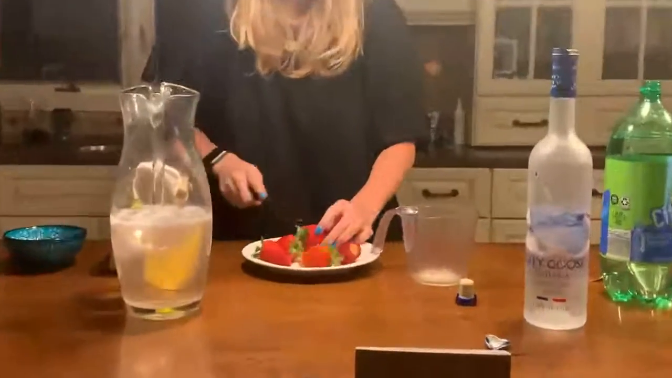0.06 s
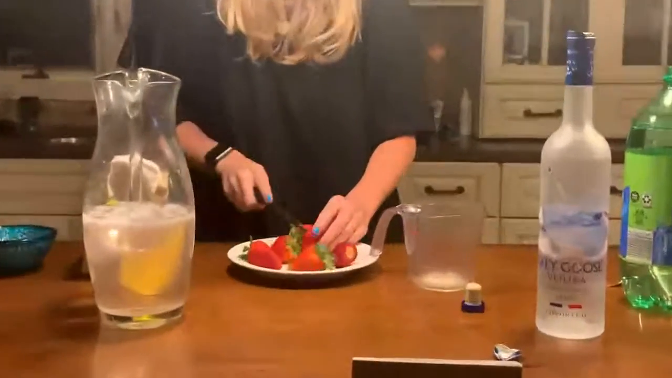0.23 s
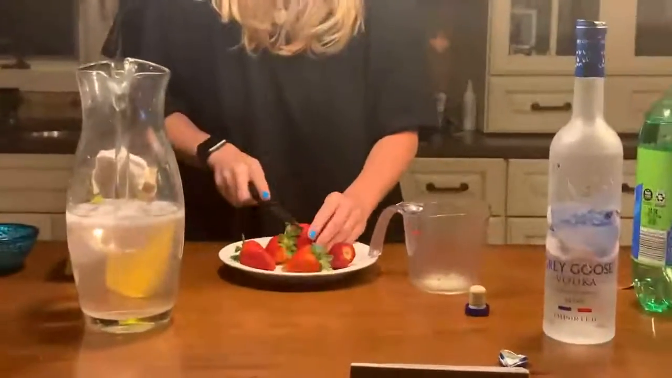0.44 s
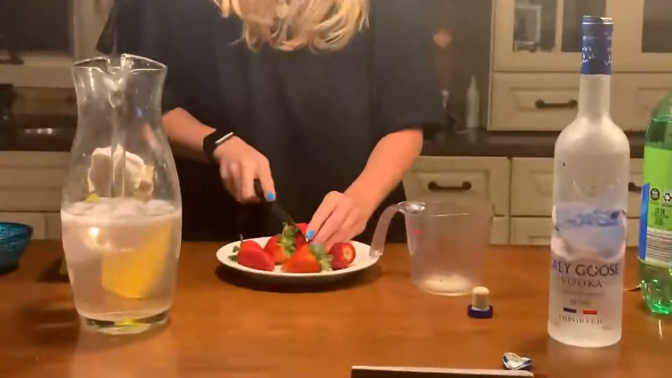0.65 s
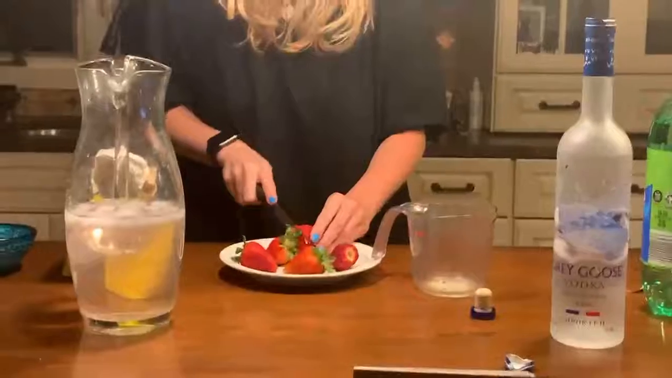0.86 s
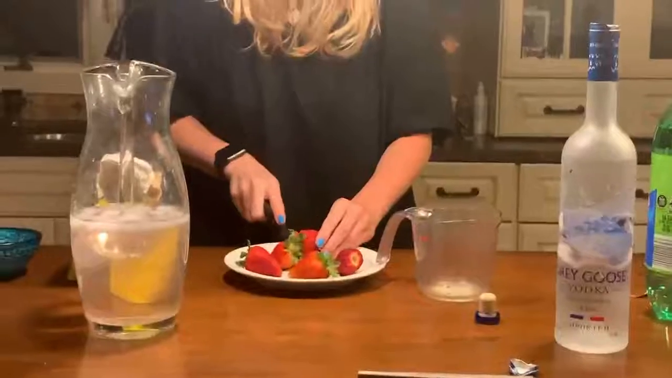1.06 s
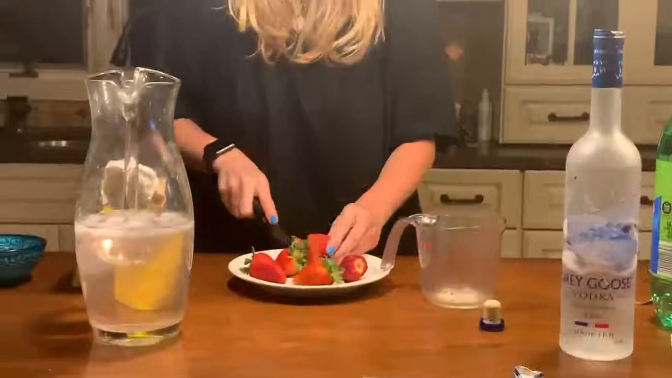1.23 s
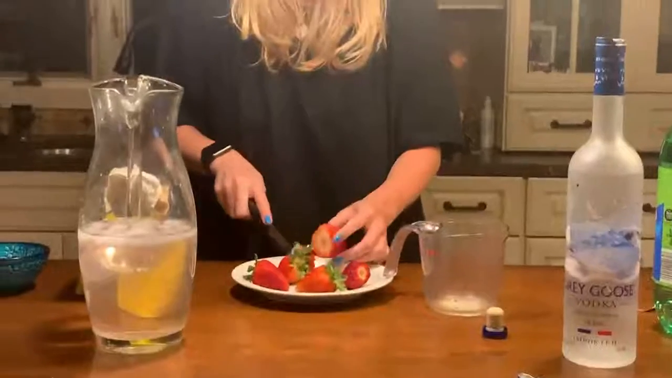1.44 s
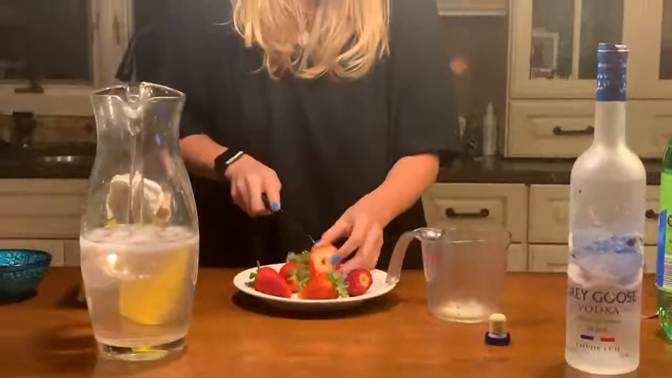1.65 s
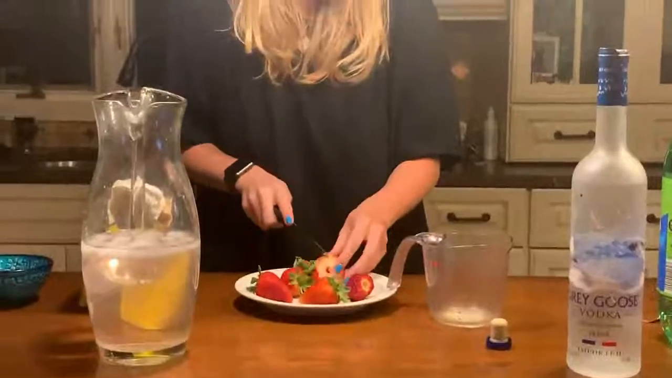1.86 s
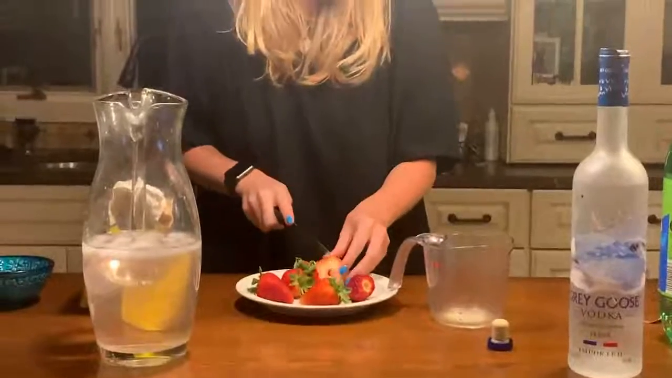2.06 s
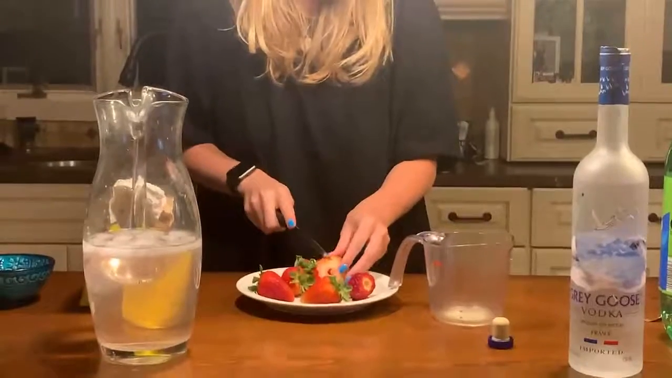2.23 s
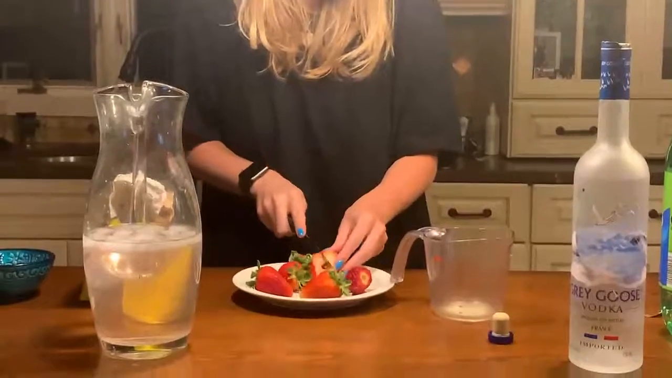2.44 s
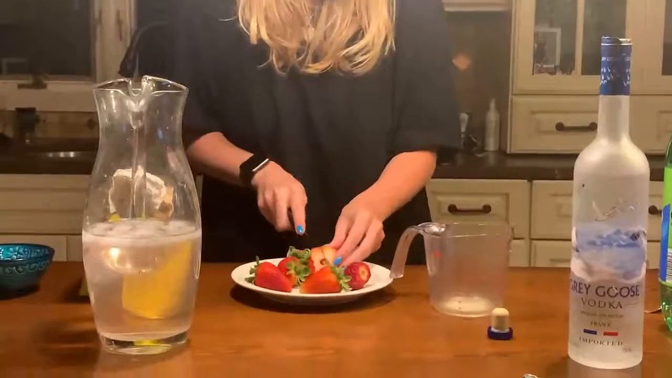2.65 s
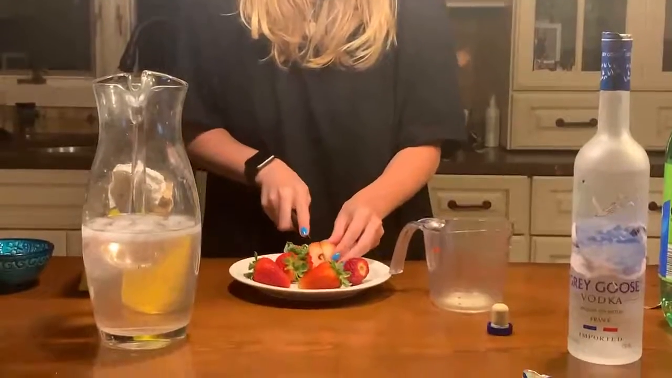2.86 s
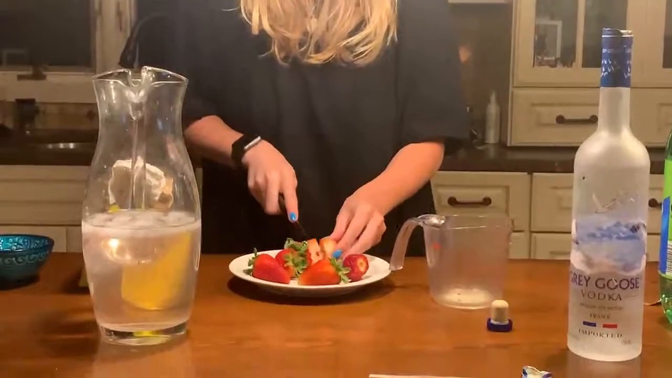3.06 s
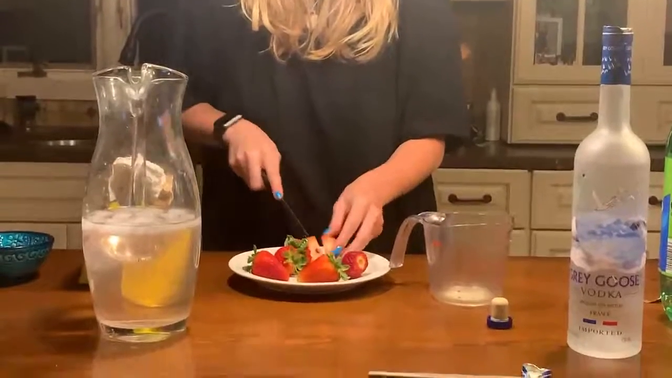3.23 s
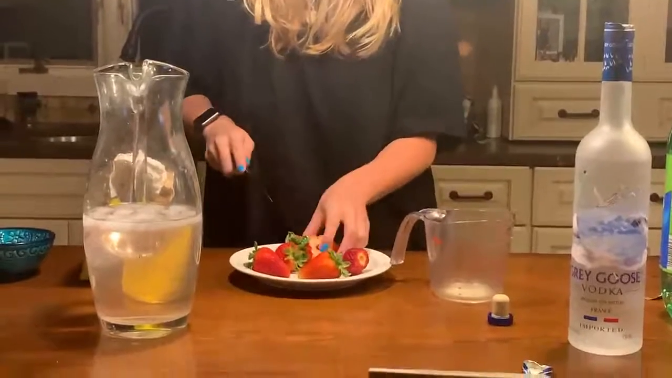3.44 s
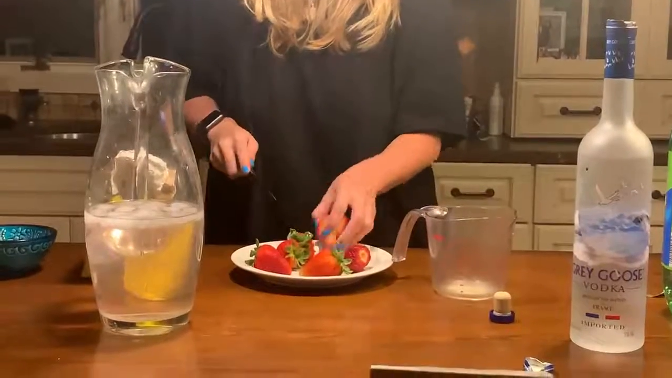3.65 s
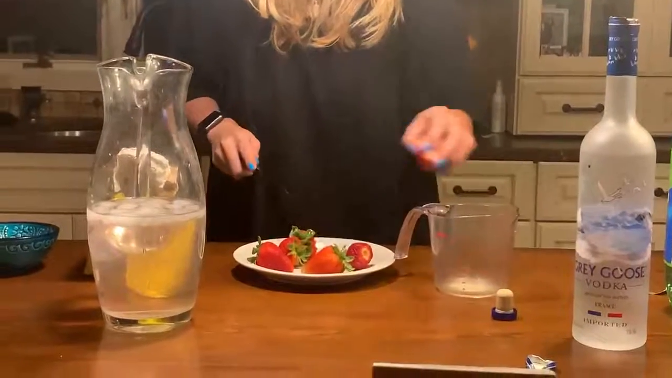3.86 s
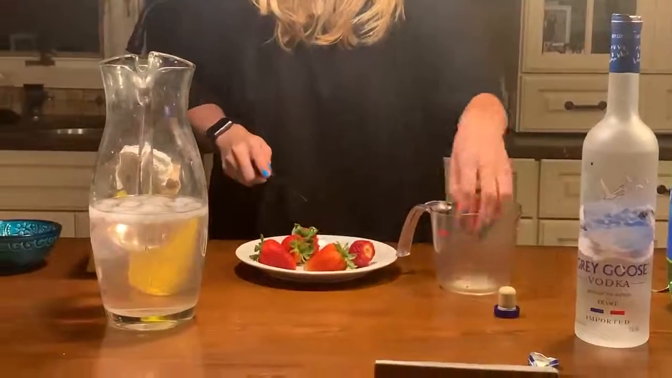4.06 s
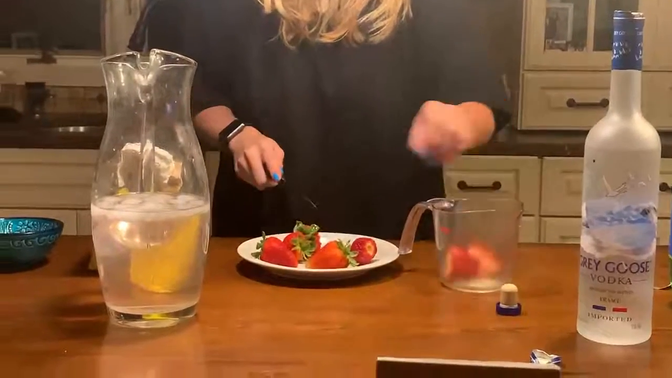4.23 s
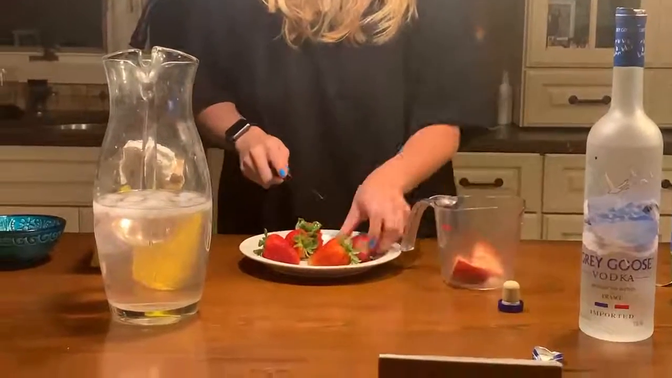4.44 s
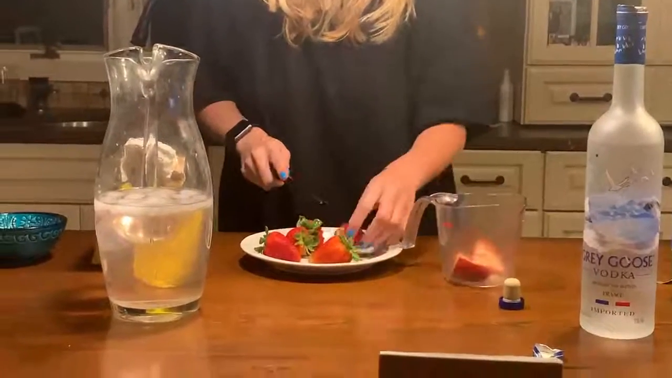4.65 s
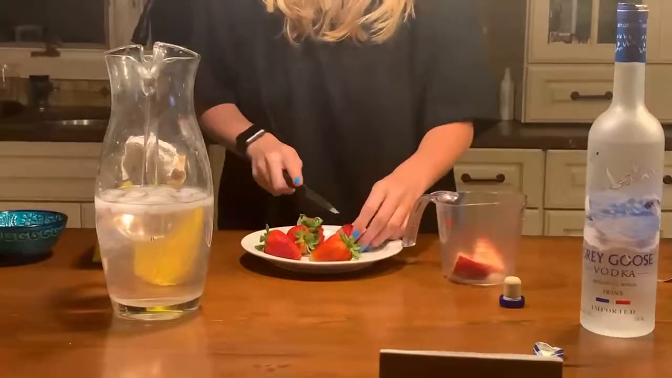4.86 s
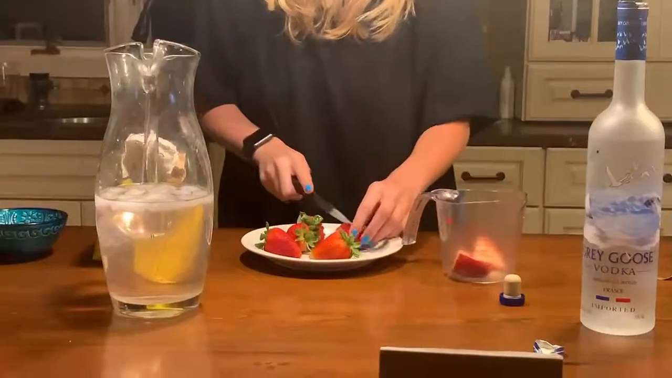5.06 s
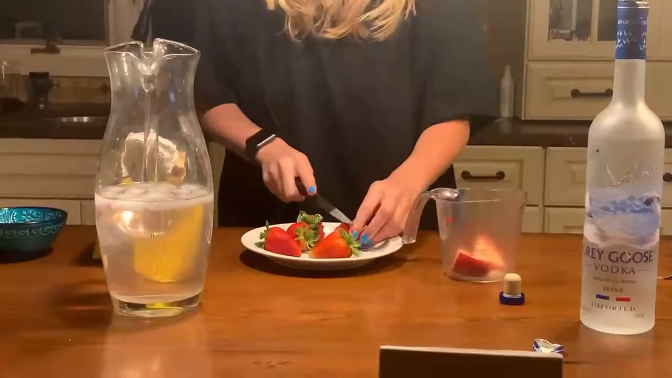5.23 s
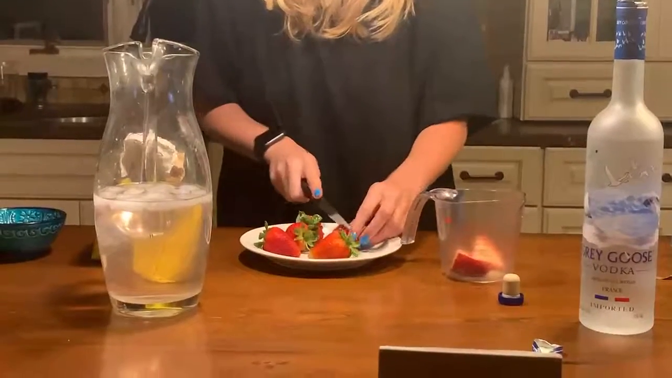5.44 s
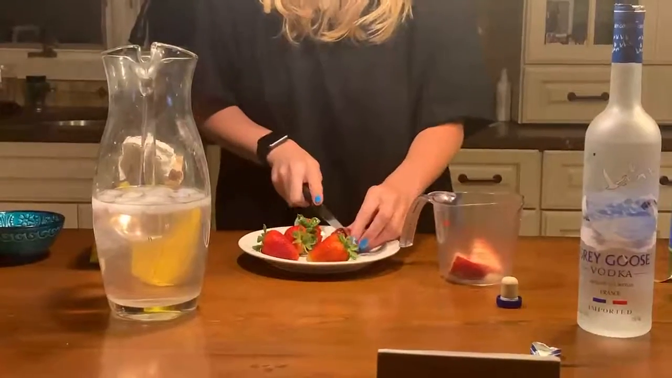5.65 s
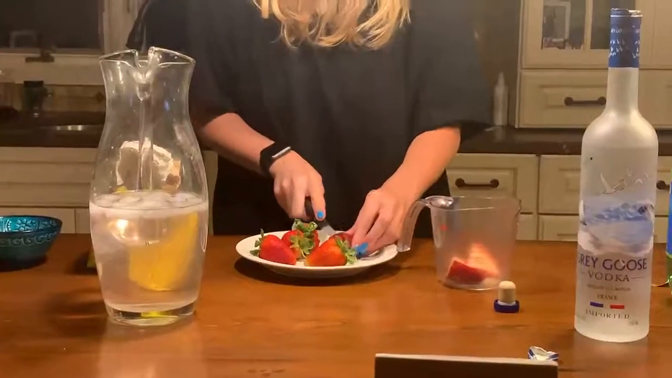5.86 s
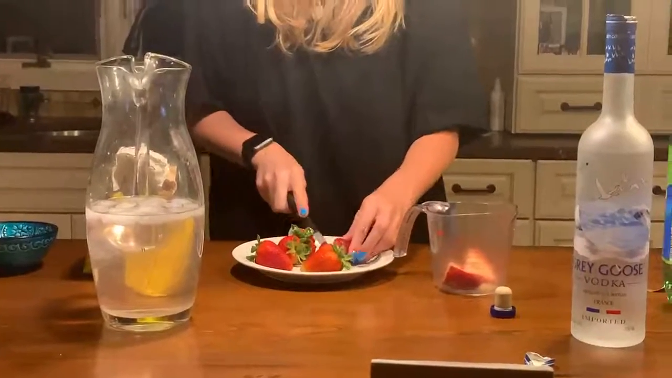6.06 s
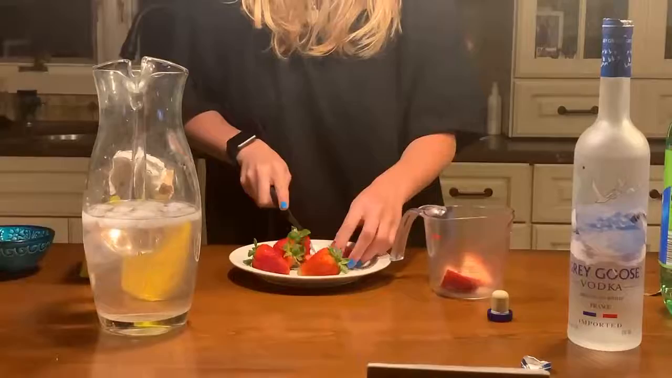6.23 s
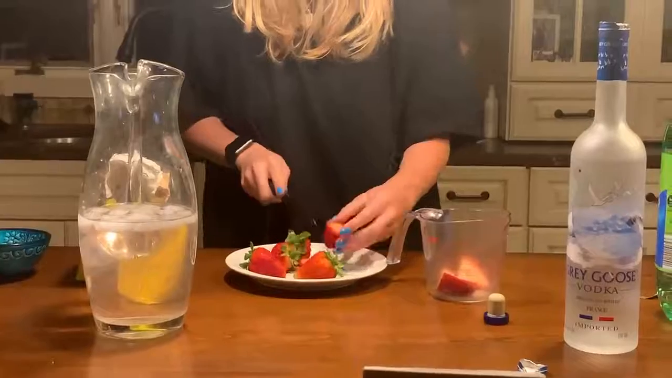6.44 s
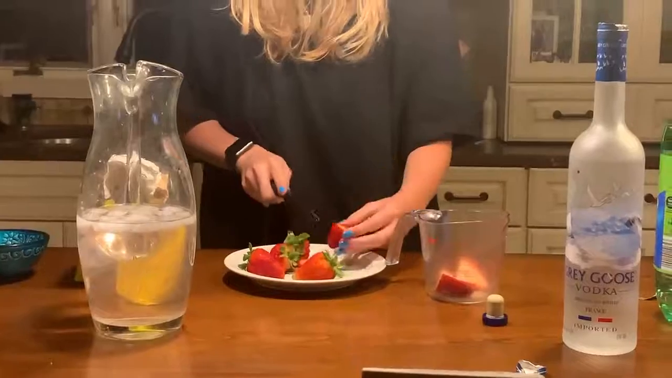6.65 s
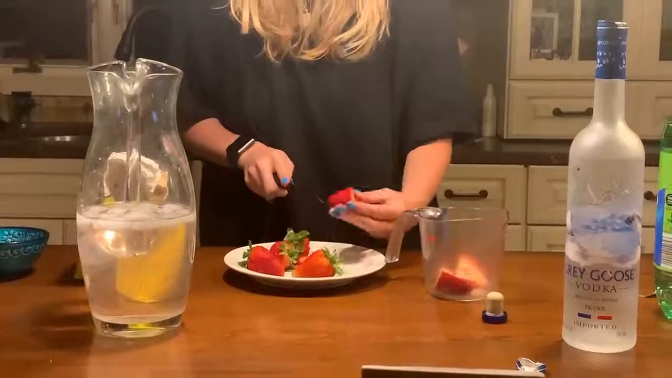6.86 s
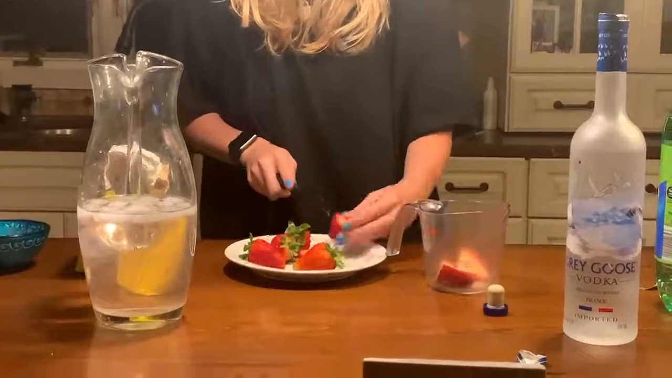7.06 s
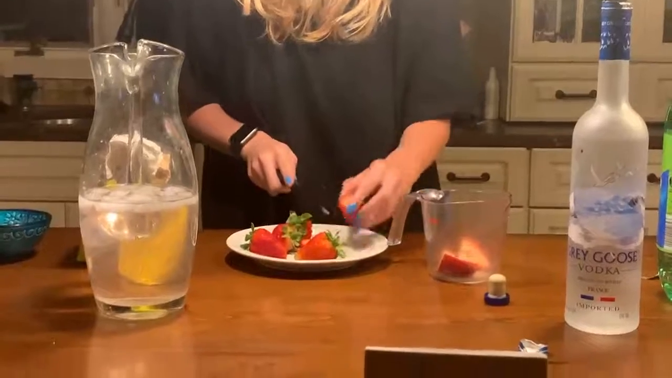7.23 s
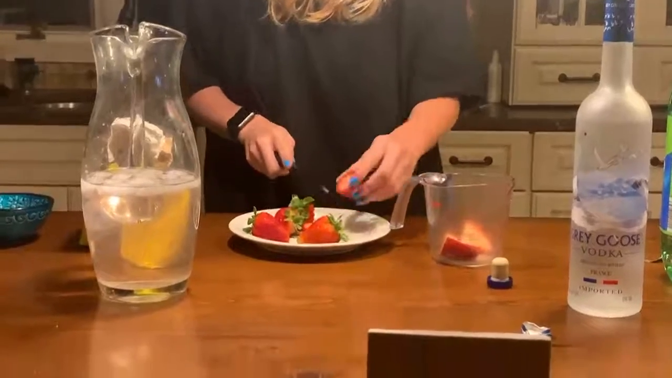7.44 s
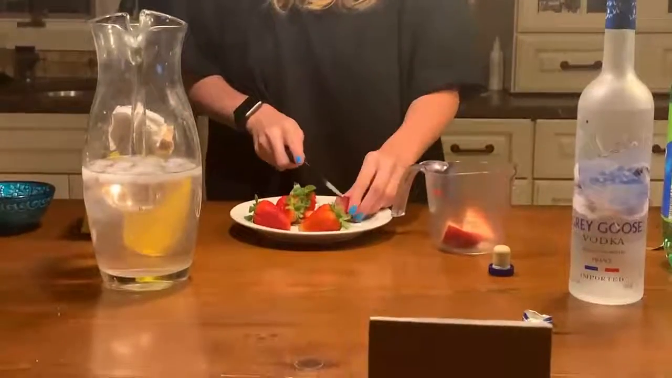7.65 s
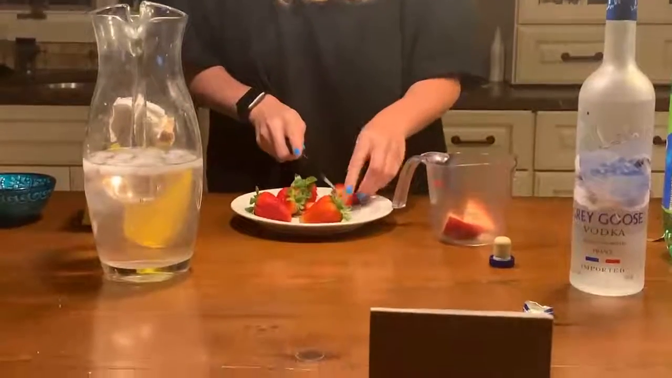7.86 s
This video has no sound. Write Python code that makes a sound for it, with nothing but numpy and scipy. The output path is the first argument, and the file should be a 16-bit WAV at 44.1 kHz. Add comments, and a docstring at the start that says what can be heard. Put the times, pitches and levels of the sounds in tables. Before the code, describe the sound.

Close phone pickup of fruit being cut on a plate at a wooden table. Quiet moist strokes lead to three bright, hard blade landings, the first loudest; the first two are followed by gritty scratches on the glaze. Between the second and third, soft fruit drops into a plastic jug with a hollow thud and wet slap. Short lively room reverberation, a wavering distant appliance hum, and small late handling knocks.

```python
"""A small knife saws through soft fruit and lands on a ceramic plate: noise strokes, struck plate modes.
The blade drags on the glaze (grain noise into the same modes); cut pieces thump a plastic jug and a glass
vessel rings along (mode banks). An appliance hums far off (narrow noise) in a quiet, hard-walled kitchen
(fading noise tail). A phone hears it through two ports."""
import sys
import numpy as np
from scipy import signal
from scipy.fft import rfft, irfft
from scipy.io import wavfile
from scipy.ndimage import uniform_filter1d

SR = 44100
rng = np.random.default_rng(int(sys.argv[2]) if len(sys.argv) > 2 else 0)


def digitize_waveform(pressure):
    """Quantize a signal to 16-bit integers and store it at the path in sys.argv[1].

    Rows of a 2-D input are taken as channels; values are limited to [-1, 1].
    """
    field = np.atleast_2d(pressure).T
    bounded = np.clip(field, -1, 1)
    quanta = np.round(bounded * 32767).astype(np.int16)
    wavfile.write(sys.argv[1], SR, quanta)


def boost_factor(decibels):
    """Convert a level in decibels to a linear amplitude factor."""
    exponent = np.asarray(decibels, float) / 20
    return 10 ** exponent


N = 348390  # samples

# background hush, spectral shape: (frequency [Hz], relative density [dB])
HUSH_SHAPE = [(12, -42), (30, -5.5), (55, -4.5), (120, -6.5), (260, -8), (377, -12), (480, -9), (718, -17),
              (1300, -27.5), (2500, -34.5), (7100, -39), (8650, -41.5), (10200, -35.5), (16000, -46.5)]
# appliance tones: (frequency [Hz], width [Hz])
HUM_MODES = [(58, 8), (348, 25), (384, 14), (575, 8), (1770, 6), (3570, 90), (7300, 150)]
# level of each tone before it wavers: (level [dB])
HUM_LEVELS_DB = [-77.5, -69, -68, -77, -93.5, -87, -99]
# slow swell of the hum: (time [s], gain [dB])
HUM_SWELL = [(0, 3), (.8, 2), (1.6, 4.5), (2.1, 0), (2.6, 5.5), (3.2, 3), (3.8, -4), (4.2, 6.5), (4.8, 0),
             (5.4, 1.5), (6, 1), (6.6, -1), (7.2, -2), (7.9, 3)]
# background at the two ports: (frequency [Hz], likeness [-1 to 1])
HUSH_LIKENESS = [(60, 0.48), (200, 0.49), (380, 0.41), (700, -0.4), (1400, 0.2), (3000, -0.053)]
# blade strokes through flesh: (start [s], length [s], drive [dB], favoured part [index], air re drive [dB])
SAW_STROKES = [(0.606, 0.014, -73.5, 0.092, -8.5), (0.629, 0.072, -71, 0.15, 1.5),
               (0.704, 0.022, -68, 2.1, -14), (0.781, 0.09, -63.5, 0.48, -9.5),
               (0.887, 0.12, -56, 1.67, -8), (0.969, 0.054, -50.5, 2.1, -22), (2.31, .11, -70, 0.45, -16.5),
               (2.399, 0.14, -60, 0.22, -21.5), (2.528, 0.052, -63.5, 0.54, -31),
               (2.564, 0.13, -60, 1.2, -21.5), (2.75, 0.08, -67, 1.54, -21),
               (2.803, 0.02, -50.5, 2.8, -21.5), (5.419, 0.15, -75, .1, -15.5),
               (5.508, 0.072, -77, .4, -18), (5.627, 0.1, -67.5, 0.77, -9), (5.762, 0.18, -60, 1.84, -16),
               (5.896, 0.013, -47.5, 2.5, -29.5), (7.613, 0.091, -79.5, .1, -25),
               (7.809, 0.046, -69.5, 3.9, -7)]
# dull, middle, crisp and airy part of the sawing: (low edge [Hz], high edge [Hz])
SAW_BANDS = [(600, 1700), (1700, 3200), (3200, 7500), (9500, 15500)]
# small knocks of fruit and blade: (time [s], drive [dB], frequency [Hz], width [Hz])
SMALL_KNOCKS = [(.004, -63.5, 2885, 30.7), (1.466, -62.5, 12000, 5000), (2.352, -57, 2200, 1498),
                (2.539, -48.5, 910, 144.3), (5.705, -47, 380, 59.6), (.718, -40.5, 4300, 2430),
                (.733, -57, 3320, 1500), (2.553, -37, 900, 119), (5.543, -45, 1420, 198),
                (7.052, -53, 629, 99.3), (7.627, -45.5, 932, 60.5), (7.63, -40, 380, 70),
                (7.683, -42, 636, 153.6), (7.71, -48, 520, 150), (7.649, -60, 13040, 5000),
                (7.802, -62, 13000, 6000), (7.823, -54, 11900, 8000), (7.821, -52, 5040, 3000),
                (7.822, -53, 4300, 200), (7.826, -57, 3670, 120), (5.653, -51, 12700, 4900),
                (6.47, -59.5, 10940, 4985)]
# plate modes: (frequency [Hz], width [Hz])
PLATE_MODES = [(640, 50), (750, 50), (915, 45), (1008, 35), (1200, 60), (1320, 40), (1978, 65), (2295, 60),
               (2610, 45), (2848, 35), (3085, 40), (3430, 70), (3898, 25), (4146, 30), (5158, 28),
               (5265, 90), (5567, 40), (6160, 90), (6345, 50), (7135, 35), (7830, 90), (8797, 35),
               (9330, 50), (10432, 60), (10785, 45), (11510, 80), (12370, 70), (13990, 50), (15060, 110)]
# response of each plate mode at four contact spots: (spot 0 [dB], spot 1 [dB], spot 2 [dB], spot 3 [dB])
SPOT_RESPONSE = [(-21.5, -19, -3.5, -11.5), (-24, -22.5, -21.5, -6), (-13.5, -18.5, -7.5, 3),
                 (-22.5, -14, -13.5, -1.5), (-15, -28.5, -5.5, -5), (-25.5, -41, -22, -7),
                 (0.5, -1, -3.5, 4), (1, -6, -11, 2), (-22, -15.0, -22, -4), (-11.5, -22.5, -10.5, 2),
                 (-12.5, -14, -17, -1), (-5.5, -2, 5.5, 6.5), (-34.5, -41, -51, -14),
                 (-19, -48.5, -43.5, 1), (-1.5, -16.5, -1, -11.5), (-3, -8.5, 5, -6.5),
                 (-6, -21.5, -8.5, -5), (-5, -7, -8.5, -16.5), (-2.5, -12.5, -15.5, -21.5),
                 (-14.5, -32, -52, -9.5), (-19.5, -31, -4.5, -42.5), (-38.5, -43.5, -32, -14),
                 (-29, -22, -18, -47), (-11.5, -14.5, -14, -20), (-35.5, -27.5, -6.5, -24.5),
                 (-27, -30.5, -15, -38.5), (-31, -35.5, -37.5, -26.5), (-38.5, -23, -16, -46),
                 (-20, -19, -14.5, -21.5)]
# plate-mode families that a drag favours as it moves: (centre [Hz])
FAMILY_CENTRES_HZ = [950, 2100, 3400, 7000]
# blade landings, at spots 0, 1, 2 in turn: (time [s], plate drive [dB], table drive [dB])
BLADE_BLOWS = [(0.993, -13.5, -40), (2.816, -20, -42.5), (5.906, -18, -36.5)]
# blade drags on the glaze at spot 3: (start [s], length [s], drive [dB], favoured family [index])
BLADE_DRAGS = [(1.181, 0.032, -36.5, 0.3), (1.18, .014, -35, 2.7), (1.231, 0.017, -42, 0.064),
               (3.048, .012, -30.5, .6), (3.055, 0.088, -30.5, 0.2), (3.052, .045, -36, 2.8),
               (3.092, .014, -38.5, 3.2), (3.096, 0.022, -29, 0.39), (3.115, 0.073, -34, 3.16),
               (3.131, 0.042, -23.5, 0.84), (3.168, 0.022, -25, 0.084), (3.176, 0.032, -23, 2.56),
               (3.205, 0.021, -31.5, 0.29), (3.25, 0.02, -40.5, 0.61), (3.28, 0.091, -44.5, 1.51)]
# modes of the wooden table under the plate: (frequency [Hz], width [Hz], response [dB])
TABLE_MODES = [(258, 77, -5), (380, 6.7, -7), (462.8, 70, 10)]
# glass vessel, close modes that beat: (frequency [Hz], width [Hz], signed size [ratio])
GLASS_MODES = [(2848, 3.6, 1), (2850, 3.6, -1), (2859, 5, .4), (2841, 5, -.3), (4144, 4, .3),
               (4146, 4, -.3)]
# fruit landing in the jug: (time [s], thump drive [dB], wet slap drive [dB])
JUG_DROPS = [(4.178, -21, -35), (4.215, -34.5, -72.5), (4.245, -30.5, -63)]
# jug and the table beneath it: (frequency [Hz], width [Hz])
JUG_MODES = [(64, 11), (150, 50), (242, 55), (480, 120), (770, 60), (942, 70), (1300, 200), (1800, 300),
             (2300, 300), (3430, 200)]
# response of each jug mode: (response [dB])
JUG_RESPONSE_DB = [-12.5, -10, -4, -2.5, -2.5, -5, -5, -4, -10, -16]
# room tail: (frequency [Hz], t60 [s])
ROOM_T60 = [(60, 0.49), (125, 0.73), (300, 0.58), (700, .62), (1800, 0.61), (3400, 0.59), (5200, 0.57),
            (7500, 0.49), (11000, 0.44), (15000, 0.37)]
# room tail at the two ports: (frequency [Hz], likeness [-1 to 1])
ROOM_LIKENESS = [(60, 0.39), (250, 0.91), (700, 0.21), (2000, 0.091), (5000, 0.34), (12000, 0.58)]
# phone response: (frequency [Hz], gain [dB])
PHONE_RESPONSE = [(25, -15), (55, -1), (7600, -1), (8200, -9.5), (8900, -13), (9500, -0.5), (12800, -1),
                  (13100, -12.5), (13600, -12), (14000, 3.5), (15700, 3), (16100, -9)]

HUSH_DB, HUSH_FOLLOWS = -64.5, 0.32  # level before the swell; share of the hum's swell in dB
ROOM_DB, ROOM_GAP_S, PORT_LAG_S = 2.5, 0.0034, 0.00009
# rise: share of the length spent swelling; bend: exponent; fall: loss per part below and above the favoured
SAW_SHAPE = dict(rise=0.54, bend=0.9, fall_db=(6, 7))
DRAG_SHAPE = dict(rise=0.17, bend=0.63, fall_db=(8, 11.5))


def along(table, hz):
    """Value of a (frequency, value) table on a log-frequency axis."""
    table_hz, values = np.transpose(table)
    return np.interp(np.log(np.maximum(hz, 1)), np.log(table_hz), values)


def shaped(x, table):
    """Spectrum weighted by a (frequency [Hz], gain [dB]) table."""
    return irfft(rfft(x) * boost_factor(along(table, np.fft.rfftfreq(N, 1 / SR))), N)


def band(x, lo_hz, hi_hz):
    """Band-pass."""
    sos = signal.butter(2, [lo_hz, min(hi_hz, 0.45 * SR)], "bandpass", fs=SR, output="sos")
    return signal.sosfilt(sos, x)


def unit(x):
    """Scaled to rms 1."""
    return x / np.sqrt(np.mean(x ** 2))


def ring(x, hz, width_hz):
    """One mode: a click of size 1 gives a fading sine that starts at size 1."""
    radius = np.exp(-np.pi * width_hz / SR)
    turn = 2 * np.pi * hz / SR
    return signal.lfilter([0, np.sin(turn)], [1, -2 * radius * np.cos(turn), radius ** 2], x)


def soft(x, hz, width_hz, rise_hz):
    """A mode behind a twin of width rise_hz: gradual build-up, weak far from its pitch."""
    return ring(ring(x, hz, width_hz), hz, rise_hz) * 2 * np.pi * rise_hz / SR


def clicks(time_s, drive_db):
    """Single-sample pushes."""
    x = np.zeros(N)
    x[(np.asarray(time_s) * SR).astype(int)] = boost_factor(drive_db)
    return x


def burst(x, t60_s):
    """Each push becomes a fading spray of noise."""
    decay = np.exp(-np.log(1000) / (t60_s * SR))
    return signal.lfilter([1], [1, -decay], x) * rng.standard_normal(N)


def grit(scatter_db, size):
    """Noise of uneven grains, each size samples long, at rms 1."""
    grain_db = scatter_db * rng.exponential(size=N // size + 1)
    grain = np.repeat(boost_factor(grain_db), size)[:N]
    return unit(grain * rng.standard_normal(N))


def walk(rate_hz):
    """Random levels held 1 / rate_hz and slewed twice; spread near 1."""
    hold = int(SR / rate_hz)
    steps = np.repeat(rng.standard_normal(N // hold + 1), hold)
    return 1.3 * uniform_filter1d(uniform_filter1d(steps, hold), hold)[:N]


def strokes(table, count, rise, bend, fall_db):
    """Gains over time, a row per part: strokes swell, die, and weaken away from the favoured part."""
    gains = np.zeros((count, N))
    for start_s, length_s, drive_db, favoured, *_ in table:
        start, length = int(start_s * SR), int(length_s * SR)
        u = np.arange(length)[:N - start] / length
        swell = np.minimum(u / rise, (1 - u) / (1 - rise)) ** bend
        away = np.arange(count) - favoured
        part_db = drive_db - np.where(away < 0, -fall_db[0], fall_db[1]) * away
        gains[:, start:start + length] += boost_factor(part_db)[:, None] * swell
    return gains


def ports(likeness, count):
    """Two noises whose likeness follows a table over frequency."""
    alike = np.clip(along(likeness, np.fft.rfftfreq(count, 1 / SR)), -1, 1)
    mid, side = rfft(rng.standard_normal((2, count)))
    mid = mid * np.sqrt((1 + alike) / 2)
    side = side * np.sqrt((1 - alike) / 2)
    return irfft(np.array([mid + side, mid - side]), count)


def background():
    """Shaped-noise hush and the appliance's narrow noise tones, wavering most when high."""
    hush = shaped(ports(HUSH_LIKENESS, N), HUSH_SHAPE)
    noise = ports(HUSH_LIKENESS, N)
    hum = 0
    for (hz, width_hz), level_db in zip(HUM_MODES, HUM_LEVELS_DB):
        waver_db = (0.1 + min(hz, 3600) / 1300) * walk(3.6)
        hum = hum + boost_factor(level_db + waver_db) * unit(soft(noise, hz, width_hz, 3 * width_hz))
    swell_db = np.interp(np.arange(N) / SR, *np.transpose(HUM_SWELL))
    return boost_factor(HUSH_DB + HUSH_FOLLOWS * swell_db) * unit(hush) + boost_factor(swell_db) * hum


def fruit():
    """Cells burst under the sawing blade and the plate beneath hums along; pieces knock now and then."""
    cells = grit(2.2, size=30)
    air_strokes = [(start_s, length_s, drive_db + air_db, 0)
                   for start_s, length_s, drive_db, _, air_db in SAW_STROKES]
    air = strokes(air_strokes, 1, **SAW_SHAPE)
    gains = [*strokes(SAW_STROKES, 3, **SAW_SHAPE), *air]
    flesh = 0
    for gain, edges_hz in zip(gains, SAW_BANDS):
        flesh = flesh + gain * unit(band(band(cells, *edges_hz), *edges_hz))
    out = flesh.copy()
    for (hz, width_hz), spot_db in zip(PLATE_MODES[:12], SPOT_RESPONSE):
        out += boost_factor(spot_db[3] - 25.5) * soft(flesh, hz, 3.6 * width_hz, 360)
    for time_s, drive_db, hz, width_hz in SMALL_KNOCKS:
        out += soft(clicks([time_s], [drive_db]), hz, width_hz, 2 * width_hz)
    return out


def dragging():
    """How hard the drags drive each family of plate modes."""
    return strokes(BLADE_DRAGS, 4, **DRAG_SHAPE)


def plate():
    """Blows and stick-slip drags drive the same modes; the table thuds beneath."""
    time_s, blow_db, thud_db = np.transpose(BLADE_BLOWS)
    drags = dragging() * grit(2.5, size=40)
    out = np.zeros(N)
    for k, ((hz, width_hz), spot_db) in enumerate(zip(PLATE_MODES, SPOT_RESPONSE)):
        one_hot = np.eye(len(FAMILY_CENTRES_HZ))
        share = np.array([along(list(zip(FAMILY_CENTRES_HZ, row)), hz) for row in one_hot])
        blows = (-1) ** k * clicks(time_s, blow_db + spot_db[:3] - 5)
        drag = boost_factor(spot_db[3] - 6.5) * share @ drags
        steady = np.sqrt(4 * np.pi * width_hz / SR)  # evens noise-driven level across widths
        out += soft(blows + steady * drag, hz, width_hz, 140 + 0.074 * hz)
        # contact noise between the modes, less in the treble
        crack = boost_factor(-6.5) * burst(blows, 0.09) / (1 + (hz / 7000) ** 4)
        rub = boost_factor(-12.5) * drag / (1 + (hz / 4500) ** 4)
        out += band(crack + rub, hz / 1.4, hz * 1.5)
    out += band(burst(clicks(time_s, blow_db - 19), 0.005), 9800, 19845)  # tick of steel on glaze
    thud = clicks(time_s, thud_db) + boost_factor(-41.5) * drags[0]
    for hz, width_hz, response_db in TABLE_MODES:
        out += boost_factor(response_db) * soft(thud, hz, width_hz, 260)
    return band(band(out, 190, 19000), 150, 19000)  # too small to radiate deep bass


def glass():
    """Thumps and drags travel through the table; pairs start out of step, so the notes swell late."""
    time_s, thump_db, _ = np.transpose(JUG_DROPS)
    shake = boost_factor(-41) * clicks(time_s, thump_db)
    shake += boost_factor(-44) * dragging()[2] * rng.standard_normal(N)
    return sum(size * ring(shake, hz, width_hz) for hz, width_hz, size in GLASS_MODES)


def jug():
    """Soft pieces thump the modes of the plastic jug, with a wet slap of noise on top."""
    time_s, thump_db, slap_db = np.transpose(JUG_DROPS)
    push = clicks(time_s, thump_db)
    out = np.zeros(N)
    for (hz, width_hz), response_db in zip(JUG_MODES, JUG_RESPONSE_DB):
        out += boost_factor(response_db) * soft(push, hz, width_hz, 15 + 0.22 * hz)
    slap = burst(clicks(time_s, slap_db), 0.026)
    out += band(slap, 700, 2330)
    out += boost_factor(1) * band(slap, 3250, 5994)
    out += boost_factor(-4) * band(slap, 9500, 15000)
    return out


def kitchen(direct, sent):
    """Direct sound and a dense tail fading band by band; the right port hears both a little later."""
    t = np.arange(SR) / SR
    noise = ports(ROOM_LIKENESS, SR)
    tail = 0
    for hz in 64 * np.sqrt(2) ** np.arange(17):  # half-octave bands
        fade = boost_factor(-60 * t / along(ROOM_T60, hz))
        tail = tail + band(noise, hz / 2 ** (1 / 4), hz * 2 ** (1 / 4)) * fade
    onset = np.clip(t / ROOM_GAP_S - 1, 0, 1)  # silent for one gap, full after two
    tail = unit(tail * onset) / np.sqrt(SR)
    left, right = direct + boost_factor(ROOM_DB) * signal.fftconvolve(sent[None], tail, axes=1)[:, :N]
    lag = np.exp(-2j * np.pi * np.fft.rfftfreq(N, 1 / SR) * PORT_LAG_S)
    return np.array([boost_factor(0.25) * left, irfft(rfft(right) * lag, N)])


def scene():
    """Everything on the table shares the room; hands and body shade the fruit from the walls."""
    ringing = plate() + jug() + glass()
    cutting = fruit()
    return kitchen(ringing + cutting, ringing + boost_factor(-2) * cutting) + background()


def low_pass(x):
    """Removes everything above the highest recorded frequency."""
    return signal.sosfilt(signal.butter(12, 16970, fs=SR, output="sos"), x)


def record(dry):
    """The phone cuts deep bass and its ports dip twice in the treble."""
    coloured = shaped(dry, PHONE_RESPONSE)
    return low_pass(coloured)


dry = scene()
out = record(dry)
digitize_waveform(out)
```